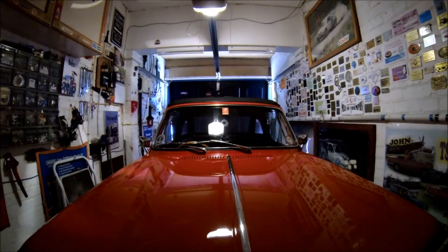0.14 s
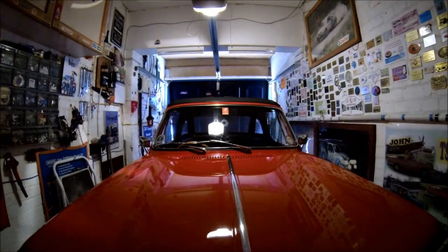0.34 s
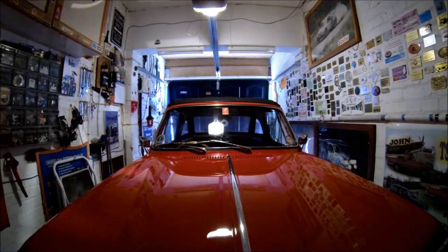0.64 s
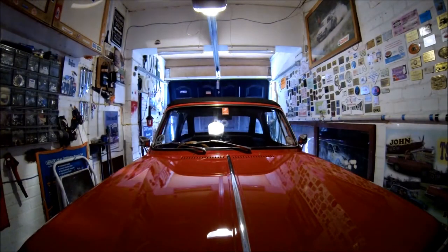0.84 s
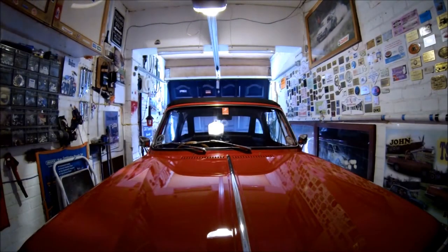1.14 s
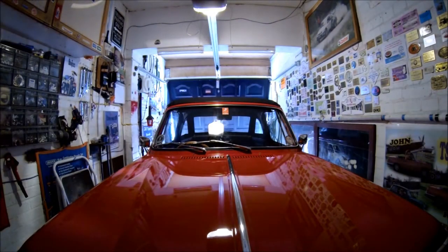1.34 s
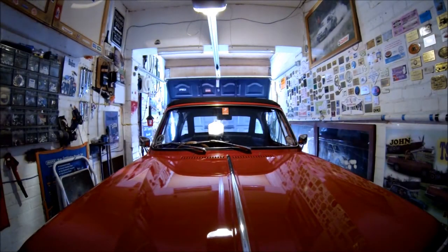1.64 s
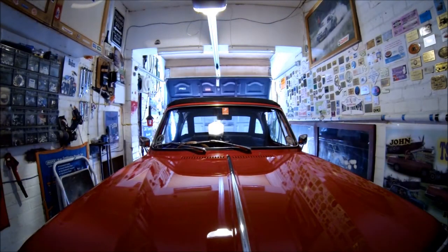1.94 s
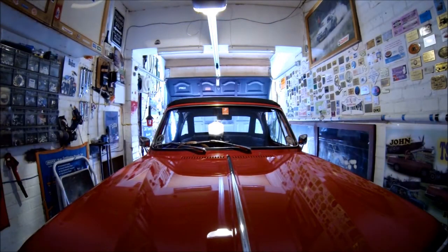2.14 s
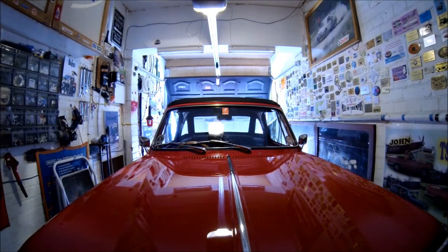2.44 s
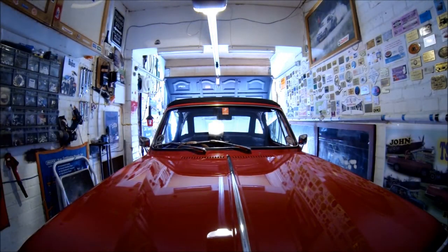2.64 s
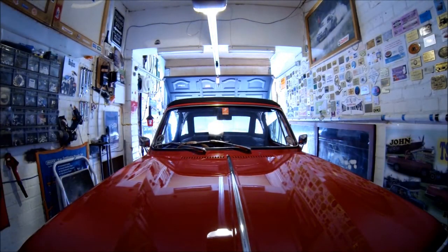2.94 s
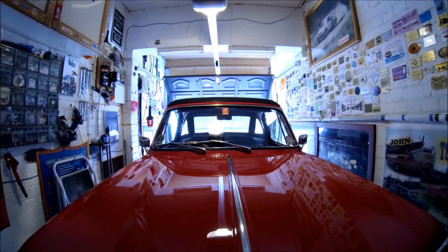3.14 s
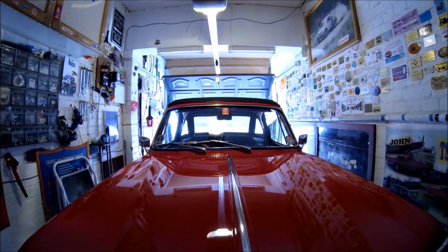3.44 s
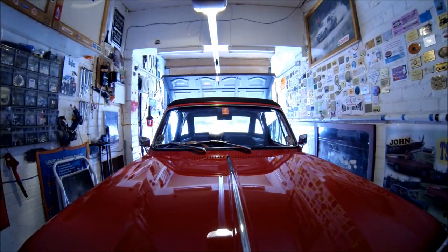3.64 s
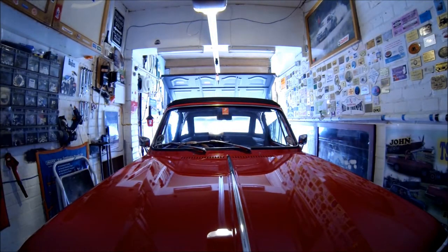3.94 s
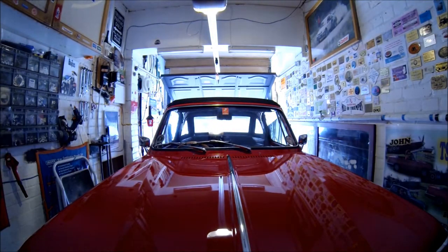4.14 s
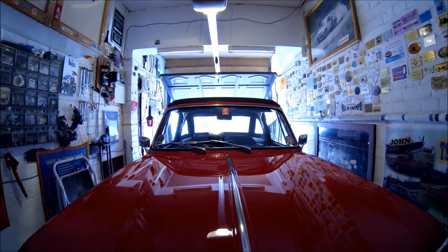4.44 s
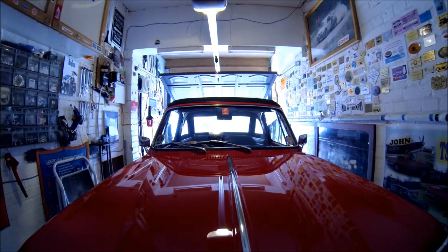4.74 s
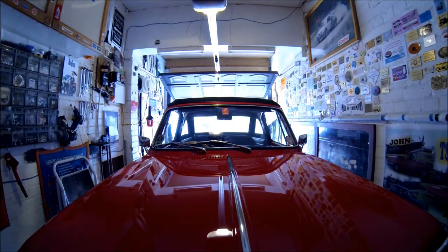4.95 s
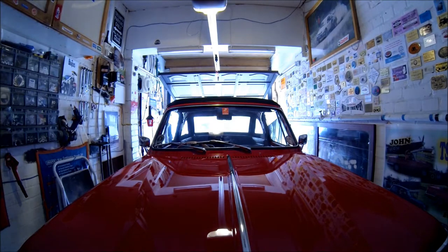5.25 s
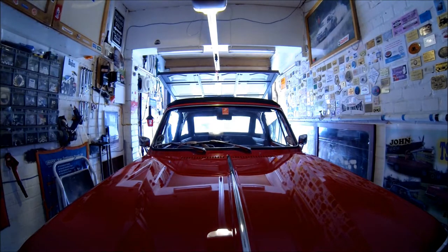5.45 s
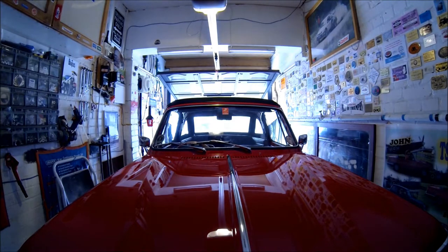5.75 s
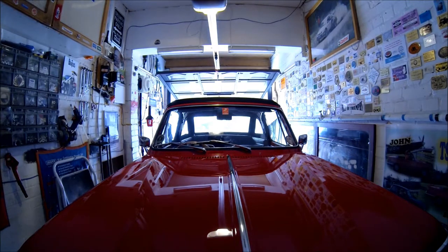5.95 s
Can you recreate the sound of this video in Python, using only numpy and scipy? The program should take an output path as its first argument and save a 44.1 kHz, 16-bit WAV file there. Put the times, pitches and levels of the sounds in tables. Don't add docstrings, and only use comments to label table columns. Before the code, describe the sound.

Inside a small hard-walled garage, an electric opener hums low and steady over grainy rubbing from the rail. In the first two seconds hinges click and loose metal rattles, with one main knock about a second in. Low rumbles and lurches follow the rollers; midway comes a dull jolt and a very faint high squeak. The hum and hiss grow a little toward the end. One fixed microphone, short room echo.

```python
import sys
import numpy as np
from scipy import signal
from scipy.fft import rfft, irfft, next_fast_len
from scipy.io import wavfile
from scipy.ndimage import uniform_filter1d

SR = 44100
rng = np.random.default_rng(int(sys.argv[2]) if len(sys.argv) > 2 else 0)


def ratio(d):
    e = np.asarray(d, float) / 20
    return 10 ** e


def int16_out(signal):
    q = np.round(np.clip(np.atleast_2d(signal).T, -1, 1) * 32767)
    wavfile.write(sys.argv[1], SR, q.astype(np.int16))


N = 268128
TIME = np.arange(N) / SR

# pitch_hz [Hz], t60_s [s]
GARAGE_T60 = [(500, 0.47), (3000, 0.33), (12000, 0.17)]
# start_s [s], pitch_hz [Hz], level_db [dB]
SQUEAK = [
    (3.745, 9600, -76),
    (3.76, 9620, -69),
    (3.785, 9640, -76),
]

SHEET_PARTS = {"section": (179, 50), "skin": (300, 93), "brace": (570, 68), "strut": (810, 32),
               "plate": (980, 67), "bracket": (1000, 78), "clip": (1330, 86),
               "bracket overtone": (2080, 37), "strap": (2650, 170), "hinge leaf": (3020, 140),
               "hinge pin": (3230, 290), "washer": (4200, 200)}
# start_s [s], part [name], level_db [dB], length_s [s]
RATTLES = [(.74, "strut", -30, 0.079), (.79, "hinge leaf", -43, .015), (.835, "bracket", -31.5, .073),
           (.835, "bracket overtone", -36.5, .06), (.833, "hinge pin", -46, .022),
           (1.096, "plate", -19.5, 0.021), (1.083, "brace", -27, 0.012), (1.09, "section", -32, .04),
           (.84, "section", -32, 0.036), (1.09, "skin", -40, .03), (1.7, "section", -41, 0.16),
           (1.09, "clip", -38, .017), (1.088, "hinge pin", -31, 0.033), (1.149, "bracket", -19, 0.0045),
           (1.105, "bracket overtone", -28.5, 0.013), (1.16, "bracket overtone", -34.5, 0.058),
           (1.477, "hinge leaf", -28.5, .012), (1.51, "hinge leaf", -42, 0.026),
           (1.481, "hinge pin", -37, 0.01), (1.481, "washer", -50, .012), (1.481, "bracket", -36, .027),
           (1.655, "hinge leaf", -42.5, .02), (1.737, "bracket", -33, .0065), (1.84, "skin", -35.5, 0.16),
           (2.02, "skin", -36, .08), (5.3, "skin", -39, 0.49), (2.72, "strap", -55, .033),
           (2.9, "bracket overtone", -44, .05)]
# start_s [s], panel_db [dB], hinge_db [dB], tick_db [dB], length_s [s]
CLICKS = [
    (0.731, -38, -43.5, -51, 0.028),
    (0.829, -32.5, -35, -48, 0.036),
    (1.086, -24.5, -36.5, -52.5, 0.028),
    (1.273, -58, -71, -64, .018),
    (1.397, -34, -47, -58.5, 0.043),
    (1.478, -33.5, -41.5, -64, 0.026),
    (1.614, -59, -61, -62, 0.014),
    (1.651, -40, -53, -70, 0.018),
]
# start_s [s], panel_db [dB], hinge_db [dB], rise_s [s]
SHOVES = [
    (.78, -48, -48.5, 0.018),
    (1.06, -37, -56, 0.016),
    (1.89, -38.5, -53, 0.038),
    (2.441, -37.5, -60, 0.036),
    (2.895, -39, -59, 0.018),
    (3.035, -39, -62, 0.019),
    (3.621, -35, -57, 0.021),
    (5.23, -37, -49, 0.013),
    (5.599, -40, -49, 0.025),
]
STROKE_RISES_S = [.005, .0007, .0007]
CRACK_DB, CRACK_S = 3, 0.0029

# pitch_hz [Hz], width_hz [Hz], level_db [dB]
DEEP_MODES = [(11.26, 3.5, -0.5), (21.7, 3, -12.5), (30.3, 7, -5), (38.5, 5.2, -5)]
# pitch_hz [Hz], width_hz [Hz], level_db [dB]
UPPER_MODES = [(60.5, 3.6, -12), (72.3, 4.2, -4), (52.4, 65, -13), (94, 43, -8.5)]
# start_s [s], level_db [dB]
SHAKE = [(0, -31), (.5, -27), (.85, -25), (1.2, -26.5), (1.5, -25), (1.65, -29), (2.3, -34), (2.6, -38.5),
         (3.0, -35), (3.4, -34), (4.0, -32.5), (4.7, -36.5), (5.1, -40.5), (5.6, -38), (6.08, -40)]
UPPER_DB, UPPER_FOLLOWS, SHAKE_LUMPS_DB = -46, 0.98, 2
# centre_s [s], deep_db [dB], upper_db [dB], half_width_s [s]
LURCHES = [(.3, -39, -34, 0.086), (.43, -28, -39, 0.038), (.915, -20.5, -31, 0.044),
           (1.14, -21.5, -29, 0.044), (1.3, -18.5, -50, 0.079), (1.44, -19.5, -35, 0.047),
           (1.75, -45, -38, 0.036), (1.84, -32, -38, .05), (2.13, -28, -35, 0.033), (2.5, -50, -40, .03),
           (3.13, -32, -47, 0.023), (3.64, -19.5, -32, 0.031), (4.1, -45, -39, .03), (4.19, -23, -47, .045),
           (4.5, -40, -42, .06), (4.76, -46, -33, .025), (4.98, -49, -41, .025), (5.29, -36, -45, .04),
           (5.45, -34, -44, .03), (5.84, -32, -48, 0.032), (6.07, -55, -46, .04)]
# start_s [s], level_db [dB], pitch_hz [Hz]
JOLTS = [
    (3.615, -39, 34),
    (4.105, -22, 64.3),
    (4.16, -28, 24),
]

# start_s [s], level_db [dB]
LOAD = [(0.0, -49.5), (0.22, -49), (0.46, -46), (0.8, -43.5), (0.91, -47), (1.12, -48.5), (1.34, -45.5),
        (1.69, -49.5), (1.89, -47.5), (2.08, -49.5), (2.91, -53), (3.1, -48), (3.76, -42.5), (4.98, -42.5),
        (5.18, -40.5), (6.08, -41)]
HUM_HZ = 99.77
# start_s [s], level_db [dB]
HUM = [(0.0, -39), (0.03, -41), (0.78, -32), (1.22, -37.5), (1.32, -29.5), (1.66, -36), (2.13, -36),
       (2.17, -33), (3.2, -33.5), (4.3, -27), (4.93, -31), (5.23, -25.5), (6.05, -27), (6.08, -24)]
# multiple [of HUM_HZ], level_db [dB at mean load], load_share [dB/dB]
LOAD_ORDERS = [(2, -44, 1.02), (4, -46.5, 0.34), (5, -51, 1.2)]
# multiple [of HUM_HZ], level_db [dB]
WEAK_ORDERS = [(3, -58), (6, -60), (8, -68), (9, -56)]
# pitch_hz [Hz], level_db [dB]
GEAR_LINES = [(60.5, -48), (358.5, -50.5), (557.5, -50.5), (759, -60)]
RUN_UP_S, RUN_UP_DB = 0.12, -13
SAG_FROM_S, SAG_DB_PER_S = 3.5, -2

# pitch_hz [Hz], width_hz [Hz], lift_db [dB]
RAIL = [(366, 19, 3.5), (448, 6.7, 4), (552.3, 22, 7), (619, 9.7, 4), (802, 9.3, 9), (852.6, 16.7, 9),
        (917, 10.5, 6.5), (1013, 8, 9.5), (1283, 62, 4), (1582, 11, 8), (1751, 12, 8.5), (1817, 23, 4.5),
        (1884, 26, 7), (2045, 36, 2.5), (1990, 16, -4), (2446, 24, 3.5), (2900, 21, 4.5), (5140, 39, 8)]
# pitch_hz [Hz], level_db [dB per Hz]
DRIVE_COLOUR = [(60, -31), (125, -18.5), (170, -25.5), (230, -31.5), (320, -33.5), (350, -17.5), (450, -25),
                (560, -21.5), (700, -20.5), (800, -22), (1060, -19.5), (1150, -26.5), (1550, -30.5),
                (2050, -27.5)]
# pitch_hz [Hz], level_db [dB per Hz]
TOP_COLOUR = [(2250, 0), (2700, -3.5), (3100, -3), (4500, -8), (5300, -12), (5700, -15), (7600, -20.5),
              (8800, -18.5), (9600, -22.5), (11000, -22.5), (11900, -29), (13300, -29.5), (14800, -39),
              (15300, -51)]
ZONES_HZ = [260, 420, 1000, 1800, 4500, 7000]
ZONE_OF = [0, 1, 1, 2, 2, 3]
# level_db [dB at mean load], load_share [dB/dB], overhead_db [dB gained overhead]
ZONE_LAWS = [(-48.5, 0.56, -3), (-36.5, 0.85, -1.55), (-44.5, 1, 0.25), (-66.5, 0.31, 2)]
BEND_S, BEND_SPREAD_S = 3.4, 0.17
# centre_s [s], half_width_s [s], level_db [dB]
LULL = (1, 0.04, -1.5)


def rms_one(x):
    return x / np.sqrt(np.mean(x ** 2) + 1e-20)


def peak_one(x):
    return x / np.sqrt(uniform_filter1d(x ** 2, size=SR // 100).max())


def in_time(rows):
    s, *columns = np.transpose(rows)
    return [np.interp(TIME, s, c) for c in columns]


def at_hz(points, hz):
    points = np.array(points)
    return np.interp(np.log(hz), np.log(points[:, 0]), points[:, 1])


def drift(rate):
    r = np.exp(-80 * np.pi * rate / SR)
    noise = rng.standard_normal(N // 40 + 2002)
    slow = signal.lfilter([1], [1, -2 * r, r * r], noise)[2000:]
    return np.interp(np.arange(N) / 40, np.arange(len(slow)), rms_one(slow))


def band(x, low_hz, high_hz):
    sos = signal.butter(2, [low_hz, min(high_hz, .45 * SR)], "band", fs=SR, output="sos")
    return signal.sosfilt(sos, x)


def resonance(x, hz, width_hz):
    r = np.exp(-np.pi * width_hz / SR)
    gain = (1 - r * r) / 2
    return signal.lfilter(gain * np.array([1, 0, -1]), [1, -2 * r * np.cos(2 * np.pi * hz / SR), r * r], x)


def coloured(x, low, top, step_db):
    size = next_fast_len(x.shape[-1])
    hz = np.maximum(np.arange(size // 2 + 1) * SR / size, 1)
    points = list(low) + [(f, db + step_db) for f, db in top]
    return irfft(rfft(x, size) * ratio(at_hz(points, hz)), size)[..., :x.shape[-1]]


def garage(x):
    age = np.arange(SR // 2) / SR
    tail = np.zeros(len(age))
    for hz in 300 * 2. ** np.arange(7):
        echoes = band(rng.standard_normal(len(age)), hz / np.sqrt(2), hz * np.sqrt(2))
        tail += echoes * ratio(-60 * age / at_hz(GARAGE_T60, hz))
    tail = tail * np.minimum(age / 0.013, 1)
    return signal.fftconvolve(x, tail / np.sqrt(np.sum(tail ** 2)))[:N]


def near_walls(x):
    echoes = np.zeros(SR // 30)
    delays_s = rng.uniform(.001, .016, 12)
    echoes[(delays_s * SR).astype(int)] = ratio(-20) * rng.choice([-1, 1], 12)
    echoes[0] = 1
    return signal.fftconvolve(x, echoes[None] / np.sqrt(np.sum(echoes ** 2)), axes=1)[:, :N]


def squeak():
    hz, db = in_time(SQUEAK)
    sounding = (TIME > SQUEAK[0][0]) & (TIME < SQUEAK[-1][0])
    return sounding * ratio(db) * np.sin(2 * np.pi * np.cumsum(hz) / SR)


def stroke(length, rise):
    age = np.arange(SR // 2) / SR
    lumps_db = 2.2 * rng.standard_normal(126) * np.minimum(np.arange(126) / 4, 1)
    ragged = np.interp(age * 250, np.arange(126), ratio(lumps_db))
    ragged = ragged * ratio(CRACK_DB * np.exp(-age / CRACK_S))
    swell = 1 - np.exp(-age / max(rise, 1e-4))
    return ragged * rng.standard_normal(len(age)) * swell * np.exp(-age / max(length, 1e-3))


def rattles():
    out = np.zeros(N + SR)
    for s, part, db, length in RATTLES:
        hz, width = SHEET_PARTS[part]
        ring = resonance(resonance(stroke(length, 0.0019), hz, width), hz, 3 * width)
        out[round(s * SR):][:len(ring)] += ratio(db - 6.0) * peak_one(ring)
    return out[:N]


def clicks():
    strokes = [(s, length, STROKE_RISES_S, levels) for s, *levels, length in CLICKS]
    strokes += [(s, 1.2 * rise, [rise, rise], levels) for s, *levels, rise in SHOVES]
    bands_hz = [(250, 2300), (2300, 7000), (7000, 15200)]
    out = np.zeros(N + SR)
    for s, length, rises, levels_db in strokes:
        for db, rise, (low, high) in zip(levels_db, rises, bands_hz):
            noise = stroke(length, rise)
            noise = coloured(noise, [(250, 0), (1000, 2.5), (2100, -4.0)], TOP_COLOUR, step_db=-3)
            if low > 5000:
                noise = np.diff(noise)
            sound = peak_one(band(band(noise, low, high), low, high))
            out[round(s * SR):][:len(noise)] += ratio(db) * sound
    return out[:N]


def slab_mode(hz, width):
    noise = rng.standard_normal(N + SR)
    return rms_one(resonance(resonance(noise, hz, width), hz, 2.1 * width)[SR:])


def rumble():
    out = np.zeros(N)
    shake_db, = in_time(SHAKE)
    steady_db = [shake_db, UPPER_DB + UPPER_FOLLOWS * (shake_db - shake_db.mean())]
    for k, modes in enumerate([DEEP_MODES, UPPER_MODES]):
        ringing = sum(ratio(db) * slab_mode(hz, width) for hz, width, db in modes)
        swell = np.sqrt(uniform_filter1d(ringing ** 2, size=SR // 14))
        lurches = sum(ratio(row[1 + k]) * np.exp(-((TIME - row[0]) / row[3]) ** 2) for row in LURCHES)
        steady = ratio(steady_db[k] + SHAKE_LUMPS_DB * drift(6))
        out += np.hypot(steady, lurches) * ringing / swell
    for s, db, hz in JOLTS:
        cycles = np.maximum(TIME - s, 0) * hz
        out += ratio(db) * np.sin(2 * np.pi * cycles) * np.exp(-.8 * cycles)
    return out


def load_swing():
    load_db, = in_time(LOAD)
    return load_db - load_db.mean()


def hum():
    run_up_db = RUN_UP_DB * np.exp(-TIME / RUN_UP_S)
    run_up_db += SAG_DB_PER_S * np.maximum(TIME - SAG_FROM_S, 0)
    orders = [(1, in_time(HUM)[0])]
    orders += [(k, db + share * load_swing() + run_up_db) for k, db, share in LOAD_ORDERS]
    orders += WEAK_ORDERS
    lines = [(k * HUM_HZ, db, 0.16 * k) for k, db in orders]
    lines += [(hz, db, .8) for hz, db in GEAR_LINES]
    out = np.zeros(N)
    for hz, db, waver in lines:
        phase = 2 * np.pi * hz * TIME + waver * drift(2.63) + rng.uniform(0, 2 * np.pi)
        out += np.sqrt(2) * ratio(db + 1.15 * drift(2.3)) * np.sin(phase)
    return out


def drive():
    white = rng.standard_normal((2, N))
    turn = 2 * np.pi * HUM_HZ * TIME
    white = white * (1 + 0.089 * np.sin(turn) + 0.076 * np.sin(3 * turn))
    for hz, width_hz, lift_db in RAIL:
        white = white + (ratio(lift_db) - 1) * resonance(white, hz, width_hz)
    edges = 110 * 2 ** np.arange(0, 7.6, 1 / 3)
    together = drift(3.7)
    out = np.zeros((4, N))
    for k, (low, high) in enumerate(zip(edges, edges[1:])):
        piece = ratio(0.6 * together + 0.12 * drift(15)) * band(white[k % 2], low, high)
        centre = np.log(low * high) / 2
        shares = [np.interp(centre, np.log(ZONES_HZ), row[ZONE_OF]) for row in np.eye(4)]
        out += np.outer(shares, piece)
    out[2:] = near_walls(out[2:])
    out = coloured(out, DRIVE_COLOUR, TOP_COLOUR, step_db=-32.5)
    whole = out.sum(axis=0)
    zone_bands_hz = [(215, 340), (340, 1300), (1300, 5500), (5500, 14000)]
    spreads = np.array([np.std(band(whole, low, high)) for low, high in zone_bands_hz])
    overhead = (1 + np.tanh((TIME - BEND_S) / BEND_SPREAD_S)) / 2
    levels_db = np.array([db + share * load_swing() + gain_db * overhead for db, share, gain_db in ZONE_LAWS])
    lull_s, half_width_s, lull_db = LULL
    levels_db += lull_db * np.exp(-((TIME - lull_s) / half_width_s) ** 2)
    return np.sum(out * ratio(levels_db) / spreads[:, None], axis=0)


def scene():
    hits = clicks() + rattles() + squeak()
    return (hum() + drive() + rumble() + hits + ratio(-6.5) * garage(hits))[None]


def band_limit(x):
    return signal.sosfilt(signal.butter(12, 15170, fs=SR, output="sos"), x)


def record(dry):
    return band_limit(dry)


dry = scene()
out = record(dry)
int16_out(out)
```